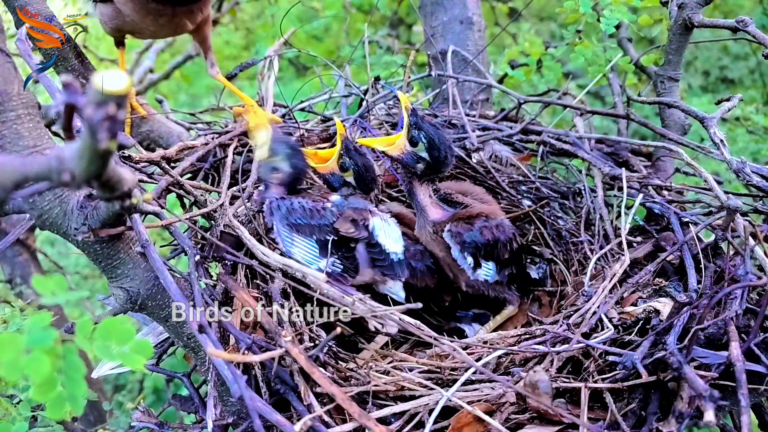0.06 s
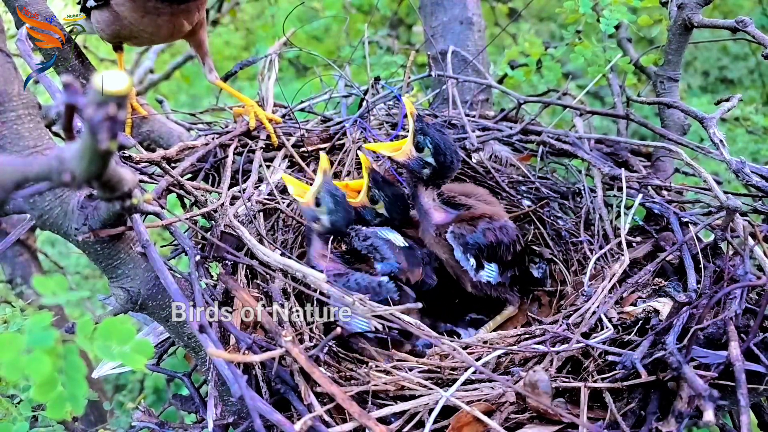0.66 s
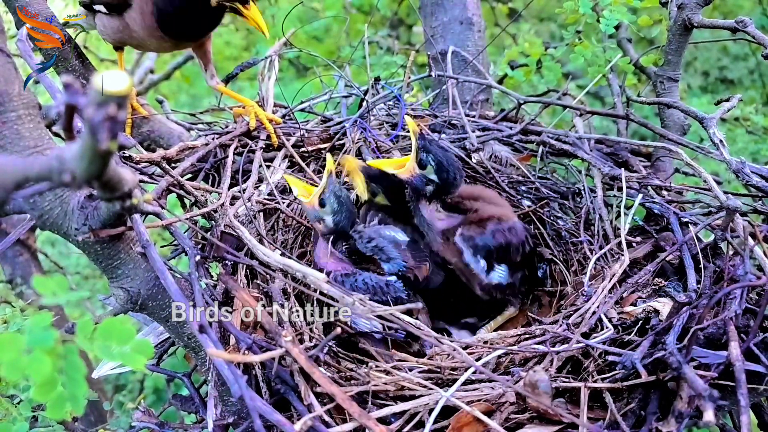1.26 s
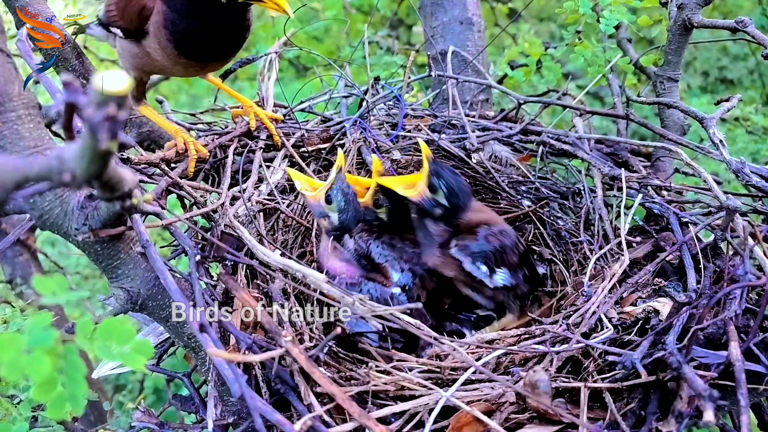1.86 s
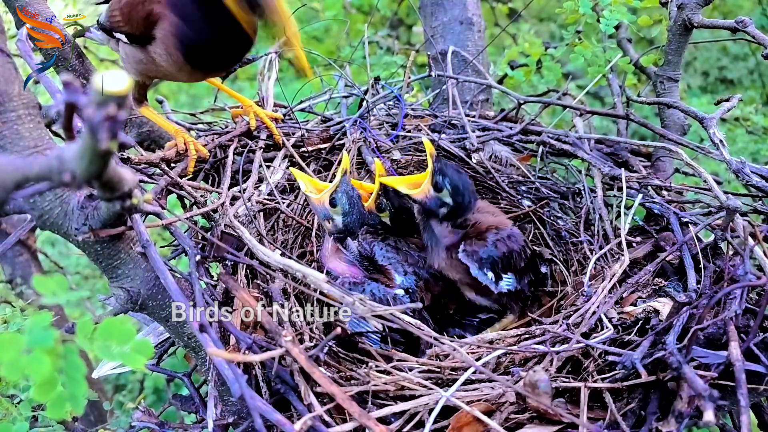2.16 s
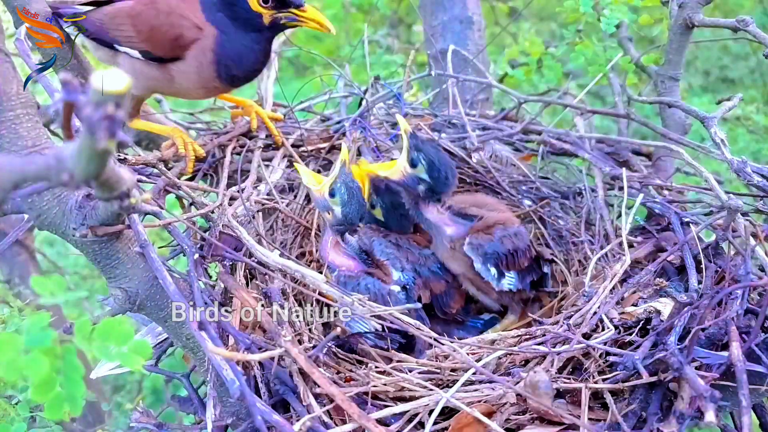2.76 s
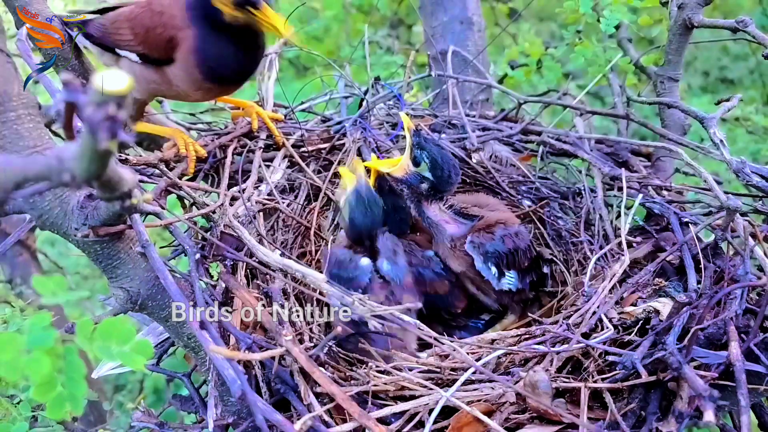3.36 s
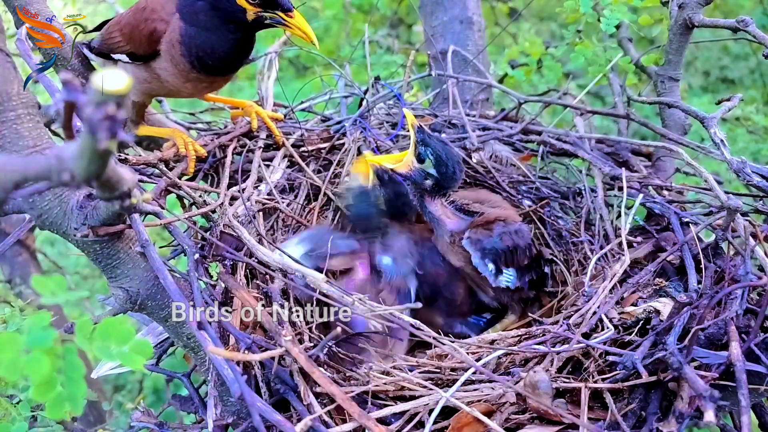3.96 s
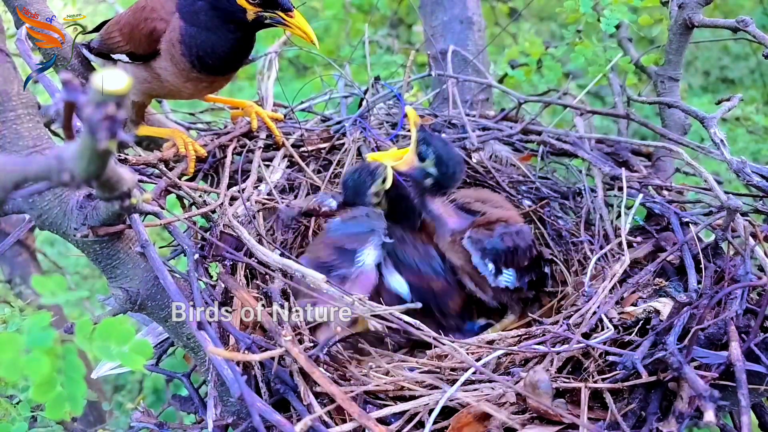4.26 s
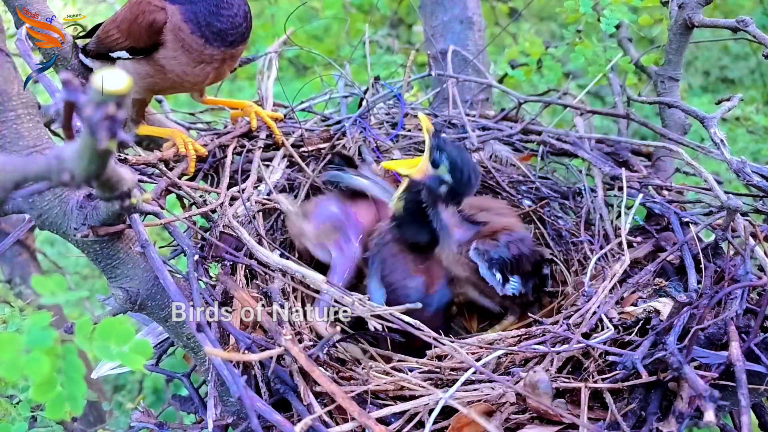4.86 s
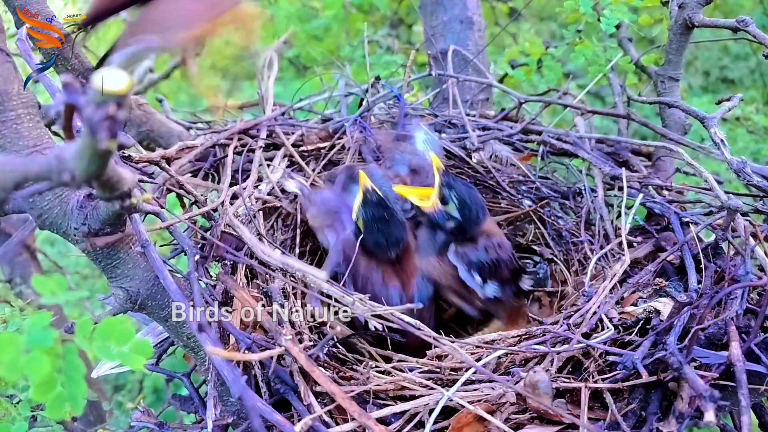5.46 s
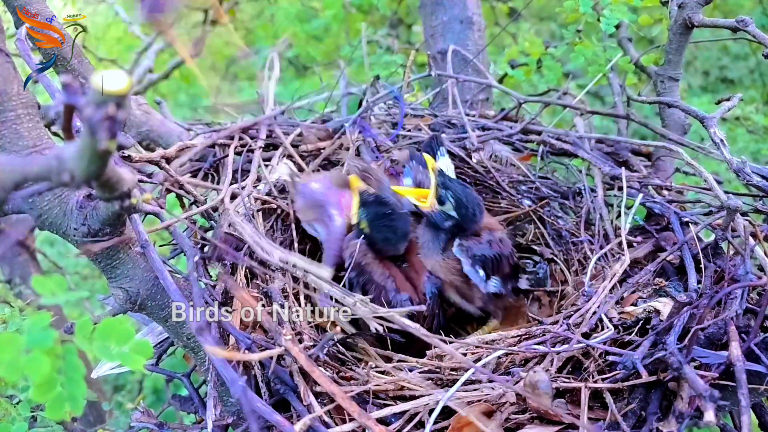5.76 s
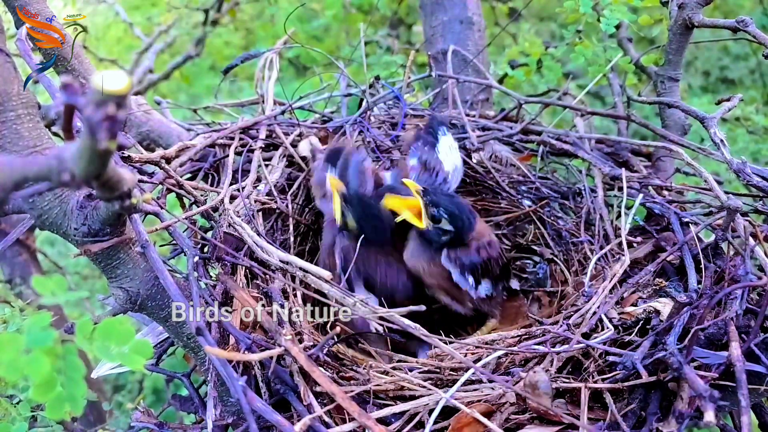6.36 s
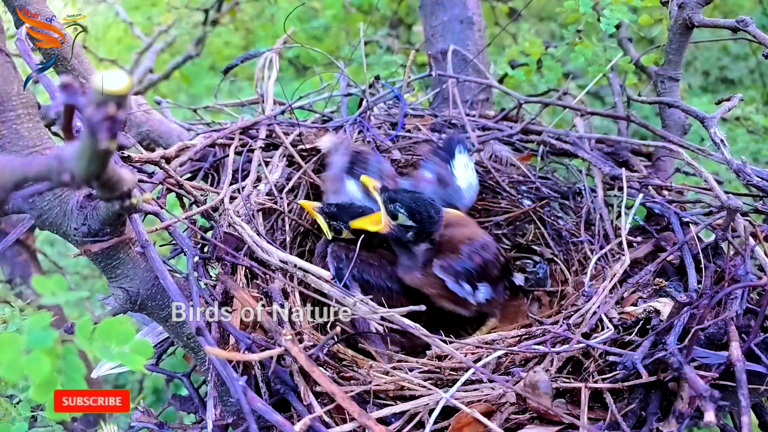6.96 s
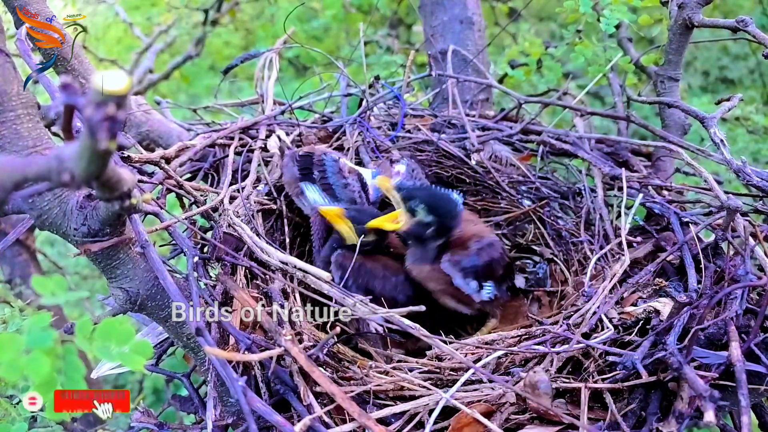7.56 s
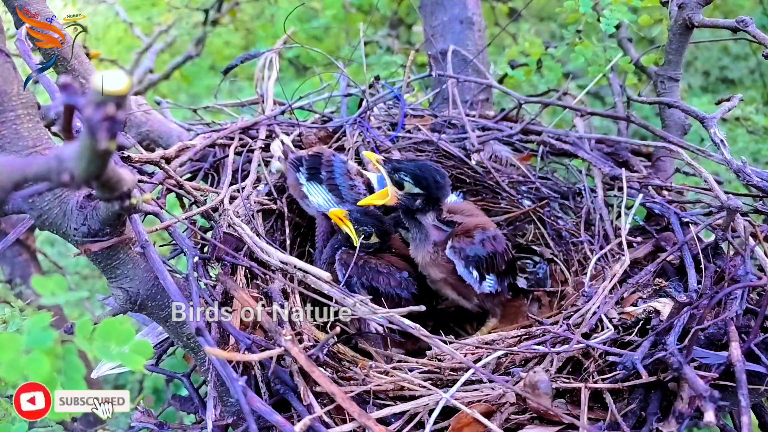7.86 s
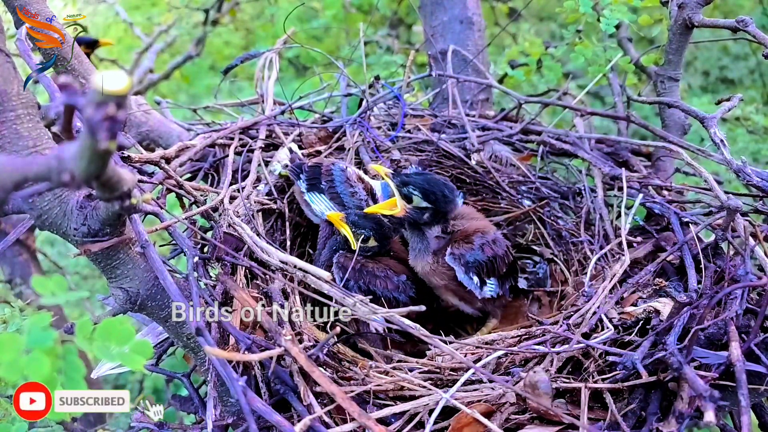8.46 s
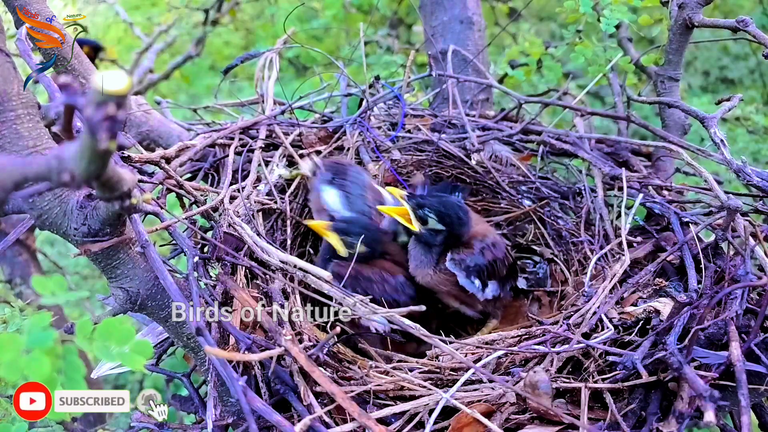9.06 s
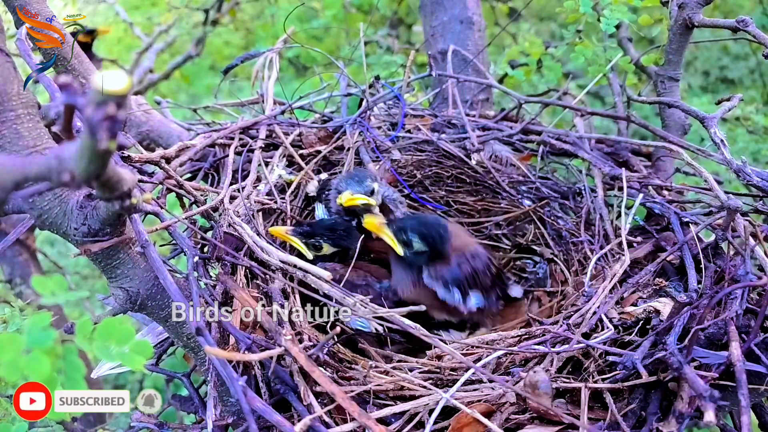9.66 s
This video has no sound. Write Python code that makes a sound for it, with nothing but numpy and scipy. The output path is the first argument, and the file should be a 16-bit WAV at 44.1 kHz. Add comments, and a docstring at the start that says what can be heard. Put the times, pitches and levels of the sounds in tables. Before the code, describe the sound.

Outdoors in a tree, young birds call for food at close range, each shrill chirp starting as a rasp and tightening into a bent whistle. The overlapping chorus is loud at first, then drops to a lighter, steady cheeping with some dry twig clicks, and ends in scattered calls. Behind it are a thin insect chirr, soft leaves, faint dove coos and, later, a far bird's short whistles.

```python
"""Three nestlings beg close by in a twig nest while a parent feeds them; twigs snap.
Each call is a rasp of membrane slaps that tightens into a bent whistle with overtones.
Behind them throughout: a cooing dove, an insect's chirr, air and leaves; at times a faint low hum.
The loud chick, a dull thump at some call peaks, stops at 3.5 s. From 5 s the others tire, beaks half
shut, and a far bird whistles. Late calls are sparse; chirr, air and leaves dip near 7.8 s and 9.6 s."""
import sys
import numpy as np
from scipy import signal
from scipy.fft import rfft, irfft, next_fast_len
from scipy.io import wavfile
from scipy.ndimage import uniform_filter1d

SR = 44100
rng = np.random.default_rng(int(sys.argv[2]) if len(sys.argv) > 2 else 0)


def dump_mix(stems):
    """Bounce the given channels to the path in sys.argv[1] as a 16-bit WAV at rate SR."""
    frames = np.atleast_2d(stems).T  # one column per channel
    limited = np.clip(frames, -1, 1)  # hard clip at full scale
    pcm = np.round(limited * 32767).astype(np.int16)
    wavfile.write(sys.argv[1], SR, pcm)


N = 427769
TIME = np.arange(N) / SR

# noise spectra: (frequency [Hz], relative density [dB])
AIR_SPECTRUM = [(25, -21), (60, 0), (150, -1.5), (350, -8.5), (540, -1), (1000, -9.5)]
LEAF_SPECTRUM = [(700, 8), (1500, 11), (3000, 1), (6000, -15), (9000, -3), (15000, -3)]
CHIRR_SPECTRUM = [(3900, -20.5), (4600, -10), (5200, 6.5), (5600, -1.5), (6200, -32), (7200, -15),
                  (8200, -48)]
THUMP_SPECTRUM = [(30, 5), (80, 3), (150, -3.5), (300, -22), (600, -10), (810, 1.5), (1000, -23)]
TWIG_SPECTRUM = [(900, -24), (2000, 7), (7000, -6), (12000, 4), (15500, -15)]
# background dips, inactive if end precedes start: (start [s], end [s])
LULL_SPANS = [(7.622, 7.92), (8.62, 8.05), (9.58, 9.9)]
# hum spells: (start [s], length [s], level [dB])
HUM_SPELLS = [(0, 0.34, -73), (5.276, 0.49, -73), (5.951, 0.3, -75)]
# dove notes: (start [s], length [s], relative level [dB], nominal pitch [Hz])
DOVE_COOS = [(0.014, 0.024, -69, 540), (0.116, 0.16, -63.5, 553.6), (0.359, 0.048, -65.5, 544),
             (0.942, 0.14, -71, 504.4), (1.93, 0.16, -63.5, 525), (2.171, 0.06, -76.5, 500.6),
             (2.744, 0.15, -69.5, 511), (2.939, 0.067, -64, 613), (3.151, 0.41, -55.5, 616.4),
             (3.712, 0.32, -58.5, 586.4), (4.616, 0.08, -69.5, 516), (4.905, 0.062, -70, 546.6),
             (6.569, 0.066, -71.5, 571), (6.713, 0.13, -69.5, 525), (6.892, 0.052, -74, 532),
             (7.397, 0.097, -70.5, 527.4), (7.806, 0.033, -76.5, 628), (8.112, 0.067, -66, 533),
             (8.535, 0.13, -74, 514.4), (9.165, 0.092, -71.5, 513.5)]
# far bird, steep and near-level notes: (start [s], length [s], onset pitch [Hz], relative level [dB])
FAR_SLURS = [(6.32, 0.023, 4684, -45.5), (6.58, 0.14, 4054, -40), (6.91, 0.028, 3010, -50),
             (7.07, 0.15, 4037, -37.5), (7.375, 0.019, 4005, -36), (7.535, 0.016, 4580, -44),
             (8.11, 0.034, 2680, -48.5)]
FAR_NOTES = [(5.40, 0.068, 3125, -57), (6.20, 0.084, 756, -69.5), (6.935, 0.04, 2954, -43.5),
             (7.33, 0.04, 4785, -39.5), (7.41, 0.031, 2940, -37.5), (7.90, 0.066, 2874, -58),
             (8.05, 0.0633, 2980, -42), (8.14, 0.05, 1226, -58), (8.19, 0.079, 747, -69),
             (9.28, 0.23, 1190, -69.5)]
# low thumps and twig snaps: (time [s], relative level [dB])
LOW_THUMPS = [(.562, -57), (0.837, -78), (1.67, -78), (1.862, -68.5), (3.398, -80)]
TWIG_SNAPS = [(1.755, -57), (3.558, -34.5), (4.45, -49), (5.072, -40), (5.093, -34.5), (5.247, -53),
              (5.70, -38), (8.398, -61)]
# tiring: (time [s], beak closure [0-1])
BEAK_CLOSURE = [(0, 0.08), (4.9, 0), (5.7, 0.9), (6.5, 0.9), (9.7, 0.47)]
# throat and beak response: (frequency [Hz], gaping gain [dB], half-shut gain [dB])
THROAT_RESPONSE = [(500, -78, -56), (1170, -25.5, -25), (1854, -16.5, -19), (2376, -4.5, -16.5),
                   (2760, -5, -10.5), (3377, -8.5, 1), (4800, -6, -22.5), (6004, 11.5, 1), (6980, -13, -23),
                   (6600, -5, 3), (9310, -10, -17.5), (10950, -29, -31), (11500, -30, -19),
                   (14960, -24.5, -38.5)]
# loud and steady chicks' calls: (start [s], crest [s], relative level [dB])
LOUD_BEGS = [(.09, 0.145, -32), (0.477, 0.567, -24), (.718, 0.837, -23.5), (0.912, 1.02, -24.5),
             (1.163, 1.278, -23.5), (1.354, 1.456, -24), (1.551, 1.668, -21), (1.754, 1.869, -22),
             (1.98, 2.116, -22), (2.206, 2.305, -22.5), (2.468, 2.59, -22.5), (2.785, 2.877, -24),
             (2.981, 3.073, -21.5), (3.288, 3.4, -24.5)]
STEADY_BEGS = [(0.222, 0.287, -27.5), (.673, 0.74, -27.5), (1.355, 1.418, -35), (1.948, 2.028, -28.5),
               (2.127, 2.185, -29), (2.403, 2.472, -31), (2.58, 2.641, -25.5), (3.23, 3.296, -30.5),
               (3.428, 3.485, -29), (3.641, 3.7, -29.5), (3.851, 3.909, -29.5), (4.108, 4.188, -27.5),
               (4.287, 4.347, -27), (4.466, 4.544, -29), (4.674, 4.758, -29.5), (4.873, 4.958, -29),
               (5.104, 5.177, -28), (5.311, 5.36, -28), (5.514, 5.593, -27.5), (5.709, 5.779, -30.5),
               (5.907, 5.981, -32), (6.11, 6.187, -30.5), (6.432, 6.519, -29), (6.58, 6.661, -28.5),
               (6.802, 6.872, -29), (7.016, 7.089, -33.5), (7.221, 7.29, -34), (7.536, 7.604, -52.5),
               (7.733, 7.802, -55.5), (7.986, 8.008, -32), (8.174, 8.237, -32), (8.518, 8.587, -54),
               (8.736, 8.758, -55), (8.926, 8.967, -63.5), (9.152, 9.232, -41), (9.338, 9.413, -32.5),
               (9.618, 9.696, -51)]
# clear chick's calls: (crest [s], pitch factor [ratio], relative level [dB])
CLEAR_PEEPS = [(.084, 1.005, -36.5), (.288, 1.05, -40), (0.412, 1.07, -36.5), (.62, 1.05, -40.5),
               (1.497, 1.124, -39), (2.006, 1.005, -38.5), (2.208, 1.07, -38), (2.488, 1.025, -36),
               (3.159, 1.002, -40), (3.415, 1.04, -38), (3.634, 1.04, -37), (3.822, 0.99, -42),
               (4.054, 1.02, -41), (4.719, .93, -46.5), (4.91, .92, -45.5), (6.059, 0.88, -56),
               (6.271, 0.91, -55.5), (9.309, 0.94, -58), (9.534, 0.96, -59)]
# whistle contours: (time from crest [s], nominal third partial [Hz])
LOUD_CONTOUR = [(-.115, 5400), (-.07, 6000), (-.052, 5700), (-.032, 6450), (-.008, 5300), (-.001, 7100),
                (.03, 6280), (.042, 6650)]
STEADY_CONTOUR = [(-.08, 5250), (-.025, 5900), (-.011, 5700), (0, 6380), (.024, 5960), (.037, 6050),
                  (.047, 5550), (.058, 4000)]
CLEAR_CONTOUR = [(-.052, 4360), (-.035, 4490), (-.019, 5880), (-.002, 5050), (.007, 5880), (.022, 5000),
                 (0.052, 4380)]
# whistle partials: (multiple of fundamental [ratio], relative level [dB])
LOUD_TIMBRE = [(1, -89.5), (1.94, -18.5), (3, 3), (3.85, -16.5), (4.9, -26.5), (5.95, -24)]
STEADY_TIMBRE = [(1, -31), (2, -16), (3, -3), (3.952, -61), (4.948, -31.5), (6, -33), (7, -40)]
CLEAR_TIMBRE = [(1, -24), (2, -7.5), (3, 8), (4, -7), (5, -18), (6, -21.5), (7, -42)]

# swell within a call; peak_s counts from the crest
LOUD_VOICE = dict(gain_db=-1.5, peak_s=-0.0013, rise_s=0.079, fall_s=0.044)
LOUD_RASP = dict(gain_db=-16, peak_s=-0.04, rise_s=0.073, fall_s=0.088)
STEADY_VOICE = dict(gain_db=-0.5, peak_s=0.011, rise_s=0.069, fall_s=0.048)
STEADY_RASP = dict(gain_db=-5, peak_s=-0.02, rise_s=0.048, fall_s=0.071)
CLEAR_VOICE = dict(gain_db=-2, peak_s=-0.006, rise_s=0.052, fall_s=0.05)
CLEAR_RASP = dict(gain_db=6, peak_s=-0.027, rise_s=0.1, fall_s=0.068)


def from_db(db):
    return 10 ** (np.asarray(db) / 20)


def unit_rms(x):
    return x / np.sqrt(np.mean(x ** 2) + 1e-20)


def evened(x):
    """Hold rms at 1 over 7 ms."""
    return x / np.sqrt(np.abs(uniform_filter1d(x ** 2, size=300)) + 1e-12)


def add(out, start_s, sound):
    at = max(0, round(start_s * SR))
    out[at:at + len(sound)] += sound[:max(0, N - at)]


def wobble(hz):
    """Low-passed noise, rms 1."""
    lowpass = signal.butter(2, hz, fs=SR, output="sos")
    return unit_rms(signal.sosfilt(lowpass, rng.standard_normal(N + SR))[SR:])


def coloured(x, spectrum):
    """Apply a spectrum, rolled off beyond its ends; rms 1."""
    hz, db = np.transpose(spectrum)
    size = next_fast_len(N)
    bin_hz = np.fft.rfftfreq(size, 1 / SR) + 1
    gain = from_db(np.interp(np.log(bin_hz), np.log(hz), db))
    rolloff = np.minimum(1, np.minimum(bin_hz / hz[0], hz[-1] / bin_hz)) ** 2
    return unit_rms(irfft(rfft(x, size) * gain * rolloff, size)[:N])


def noise(spectrum):
    return coloured(rng.standard_normal(N), spectrum)


def glides(notes, waver, taper, fall_octaves=0, curve=1):
    """Tapered sine notes sharing one fall; curve < 1 falls early, > 1 late."""
    out, bend = np.zeros(N), 1 + waver * wobble(49)
    for start_s, length_s, onset_hz, db in notes:
        size = round(length_s * SR)
        hz = onset_hz * 2 ** (-fall_octaves * np.linspace(0, 1, size) ** curve)
        hz *= np.roll(bend, -round(start_s * SR))[:size]
        tone = np.sqrt(2) * np.sin(2 * np.pi * np.cumsum(hz) / SR)
        add(out, start_s, from_db(db) * signal.windows.tukey(size, taper) * tone)
    return out


def among_trees(x, wet_db, t60_s):
    """Trunks and leaves scatter a short tail."""
    t = TIME[:SR]
    tail = rng.standard_normal(SR) * from_db(-60 * t / t60_s) * (1 - np.exp(-t / 0.003))
    return x + from_db(wet_db) * signal.fftconvolve(x, tail / np.linalg.norm(tail))[:N]


def lull(edge_s=0.04):
    """Depth of the background dip, 0-1."""
    return sum(np.clip(0.5 + np.minimum(TIME - start_s, end_s - TIME) / edge_s, 0, 1)
               for start_s, end_s in LULL_SPANS)


def air_and_leaves():
    """Low rush of air, faint hiss of leaves."""
    air = from_db(-83.5 - 6.5 * lull()) * noise(AIR_SPECTRUM)
    leaves = from_db(-86 - 10 * lull()) * noise(LEAF_SPECTRUM)
    return air + leaves


def hum(hz=54.4, octave_db=-11):
    """Intermittent low tone with a weak octave."""
    low = [(start_s, length_s, hz, db) for start_s, length_s, db in HUM_SPELLS]
    octave = [(start_s, length_s, 2 * hz, db + octave_db) for start_s, length_s, db in HUM_SPELLS]
    return glides(low, waver=0.06, taper=0.26) + glides(octave, waver=0.091, taper=0.24)


def insect(throb_hz=47, depth=0.19, start_db=-54.5, fade_db_per_s=0.35, lull_db=-24.5):
    """Throbbing narrow-band chirr, slowly fading."""
    rate_hz = throb_hz * (1 + 0.0085 * wobble(20))
    throb = 1 + depth * np.sin(2 * np.pi * np.cumsum(rate_hz) / SR)
    return from_db(start_db - fade_db_per_s * TIME + lull_db * lull()) * throb * noise(CHIRR_SPECTRUM)


def dove(onset_ratio=1.015):
    """Distant coos: each holds its pitch, then drops."""
    notes = [(start_s, length_s, hz * onset_ratio, db) for start_s, length_s, db, hz in DOVE_COOS]
    coos = glides(notes, waver=0.012, taper=0.45, fall_octaves=0.16, curve=3.8)
    return among_trees(from_db(-0.5) * coos, wet_db=2, t60_s=0.25)


def far_bird(trim_db=-4):
    """Steep slurs, near-level notes and one stutter of four tiny slurs, each louder than the last."""
    stutter = [(6.348 + 0.016 * k, 0.021, 2800, -51.5 + 2 * k) for k in range(4)]
    slurs = glides(FAR_SLURS + stutter, waver=0.0315, taper=0.24, fall_octaves=1.05, curve=0.84)
    notes = glides(FAR_NOTES, waver=0.034, taper=0.063, fall_octaves=0.113, curve=0.79)
    song = among_trees(slurs, wet_db=-8, t60_s=0.3) + among_trees(notes, wet_db=-5, t60_s=0.4)
    return from_db(trim_db) * song


def thumps(length_s=0.03):
    """Soft, dull low thumps at the peaks of some of the loud chick's calls."""
    envelope, bell = np.zeros(N), signal.windows.hann(round(length_s * SR))
    for time_s, db in LOW_THUMPS:
        add(envelope, time_s - length_s / 2, from_db(db) * bell)
    return envelope * noise(THUMP_SPECTRUM)


def twigs(decay_s=0.0082, trim_db=-19):
    """Twigs snap under the birds: dry noise bursts."""
    envelope, t = np.zeros(N), TIME[:SR // 20]
    for time_s, db in TWIG_SNAPS:
        add(envelope, time_s, from_db(db) * np.exp(-t / decay_s))
    return from_db(trim_db) * envelope * noise(TWIG_SPECTRUM)


def tiredness(time_s):
    """Beak closure: 0 gaping, 1 half shut."""
    return np.clip(np.interp(time_s, *np.transpose(BEAK_CLOSURE)), 0, 1)


def throat(source):
    """Resonances crossfade as the beak closes."""
    hz, gaping_db, shut_db = np.transpose(THROAT_RESPONSE)
    gaping, shut = coloured(source, np.c_[hz, gaping_db]), coloured(source, np.c_[hz, shut_db])
    closure = tiredness(TIME)
    return (1 - closure) * gaping + closure * shut


def membrane_slaps(rate_hz, jitter=0.35, decay_s=0.001):
    """Slack membranes slap shut at uneven intervals; each slap dies fast. Rms 1."""
    cycles = np.cumsum(rate_hz * np.exp(jitter * wobble(400))) / SR
    slaps = np.diff(np.floor(cycles), prepend=0) * from_db(0.67 * wobble(500))
    return evened(signal.lfilter([1], [1, -np.exp(-1 / (decay_s * SR))], slaps + 1e-18))


def swell(t, gain_db, peak_s, rise_s, fall_s):
    """Bell-shaped gain, 20 dB down at rise_s before and fall_s after the peak."""
    return from_db(gain_db - 20 * ((t - peak_s) / np.where(t < peak_s, rise_s, fall_s)) ** 2)


def gestures(calls, contour, voice, rasp, rough_floor, rough_per_s, accent_db, accent_at_s, accent_s):
    """Pitch, voice gain, rasp gain, roughness: a call starts rough, clears and rings out at its crest."""
    attack_s, release_s, wander_hz = 0.0058, 0.0043, 30
    sag_s = 0.076   # sag: share of pitch lost this long after the crest
    muffle_db, rasp_db_per_db = -2.5, 0.74   # a closing beak muffles the whistle
    knot_s, knot_hz = np.transpose(contour)
    median_db = np.median([call[-1] for call in calls])
    tracks = np.zeros((4, N))
    tracks[0] = np.mean(knot_hz)   # resting pitch
    for start_s, crest_s, factor, sag, db in calls:
        span = slice(*np.searchsorted(TIME, [start_s, crest_s + knot_s[-1] + release_s]))
        t = TIME[span] - crest_s
        attack, release = (TIME[span] - start_s) / attack_s, 1 - (t - knot_s[-1]) / release_s
        gate = np.clip(np.minimum(attack, release), 0, 1)
        hz = uniform_filter1d(np.interp(t, knot_s, knot_hz), size=180) * factor
        hz *= 1 - sag * np.maximum(t, 0) / sag_s
        ring_db = accent_db * np.exp(-((t - accent_at_s) / accent_s) ** 2)
        voice_gain = from_db(db + muffle_db * tiredness(crest_s) + ring_db) * swell(t, **voice)
        rasp_gain = from_db(median_db + rasp_db_per_db * (db - median_db)) * swell(t, **rasp)
        rough = np.clip(rough_floor + rough_per_s * np.maximum(-t, 0), 0, 1)
        tracks[:, span] = hz, gate * voice_gain, gate * rasp_gain, rough
    hz, voice_gain, rasp_gain, rough = tracks
    hz *= 1 + 0.011 * wobble(wander_hz)
    voice_gain *= from_db(1.8 * wobble(wander_hz))
    rasp_gain *= from_db(2.5 * wobble(wander_hz))
    return hz, voice_gain, rasp_gain, rough


def chick(gesture, partials, voice_db, rasp_db, slap_hz, jitter, blur_hz, mellow, windpipe_db):
    """Whistle with overtones, chopped by membrane slaps, over a period-doubled buzz."""
    windpipe_hz, width_hz = 3550, 260
    hz, voice_gain, rasp_gain, rough = gesture
    slaps = membrane_slaps(slap_hz)
    f0_hz = hz / 3 * (1 + jitter * rough * wobble(900) + 0.006 * wobble(70))
    phase = 2 * np.pi * np.cumsum(f0_hz) / SR
    # a soft voice keeps more of its two lowest partials
    low_boost = np.clip(voice_gain.max() / (voice_gain + 1e-9), 1, 20) ** mellow
    tone = 0
    for k, db in partials:
        resonance_db = windpipe_db * np.exp(-((k * f0_hz - windpipe_hz) / width_hz) ** 2)
        flicker_db = 2 * wobble(60) * (round(k) != 3)
        gain = from_db(db + resonance_db + flicker_db) * (low_boost if k < 2.5 else 1)
        tone += gain * np.sin(k * phase)
    chop = evened(signal.sosfilt(signal.butter(2, 700, fs=SR, output="sos"), slaps))
    bass_cut = signal.butter(6, 1500, "high", fs=SR, output="sos")   # the whistle carries no bass below 1.5 kHz
    whistle = signal.sosfilt(bass_cut, tone * (1 - rough + rough * chop))
    # half multiples around the third partial, each shaking in pitch on its own
    shake = 2 * np.pi * blur_hz * (0.5 + rough) / SR
    buzz = sum(np.sin(k * phase / 2 + np.cumsum(shake * wobble(300))) for k in np.r_[2:6, 7:17])
    noisy_buzz = unit_rms(buzz) + 0.45 * rng.standard_normal(N)
    rasp = throat(evened(noisy_buzz * slaps))
    return from_db(voice_db) * voice_gain * whistle + from_db(rasp_db) * rasp_gain * rasp


def clear_chick():
    """Clear peeps with little rasp."""
    calls = [(crest_s + CLEAR_CONTOUR[0][0], crest_s, factor, 0, db)
             for crest_s, factor, db in CLEAR_PEEPS]
    gesture = gestures(calls, CLEAR_CONTOUR, CLEAR_VOICE, CLEAR_RASP, rough_floor=0.087, rough_per_s=5,
                       accent_db=2.5, accent_at_s=0, accent_s=0.0058)
    return chick(gesture, CLEAR_TIMBRE, voice_db=6, rasp_db=-10, slap_hz=907, jitter=0.027,
                 blur_hz=196, mellow=0.58, windpipe_db=2.5)


def steady_chick(tired_drop=0.046, fresh_sag=-0.013, tired_sag=0.1):
    """About five calls a second; pitch drops and sags as it tires."""
    calls = [(start_s, crest_s, 1 - tired_drop * tiredness(crest_s),
              fresh_sag + tired_sag * tiredness(crest_s), db) for start_s, crest_s, db in STEADY_BEGS]
    gesture = gestures(calls, STEADY_CONTOUR, STEADY_VOICE, STEADY_RASP, rough_floor=0.14,
                       rough_per_s=12.81, accent_db=4.5, accent_at_s=0.0061, accent_s=0.0083)
    return chick(gesture, STEADY_TIMBRE, voice_db=5, rasp_db=0.5, slap_hz=709.5, jitter=0.012,
                 blur_hz=148.3, mellow=0.017, windpipe_db=4)


def loud_chick(fresh_sag=-0.025, sag_per_s=0.03):
    """One loud bout; call endings sag more as it goes on."""
    calls = [(start_s, crest_s, 1, fresh_sag + sag_per_s * crest_s, db)
             for start_s, crest_s, db in LOUD_BEGS]
    gesture = gestures(calls, LOUD_CONTOUR, LOUD_VOICE, LOUD_RASP, rough_floor=0.09, rough_per_s=10.99,
                       accent_db=2, accent_at_s=0.002, accent_s=0.0057)
    return chick(gesture, LOUD_TIMBRE, voice_db=4.5, rasp_db=7, slap_hz=620, jitter=0.011,
                 blur_hz=130, mellow=0.06, windpipe_db=2)


def scene():
    """Background plus a nearly dry nest; mono."""
    background = air_and_leaves() + hum() + insect() + dove() + far_bird()
    near = thumps() + twigs() + clear_chick() + steady_chick() + loud_chick()
    return (background + among_trees(near, wet_db=-34, t60_s=0.26))[None]


def record(dry):
    """Steep low-pass at 15.7 kHz."""
    return signal.sosfilt(signal.ellip(12, 0.1, 80, 15700, fs=SR, output="sos"), dry)


dry = scene()
out = record(dry)
dump_mix(out)
```